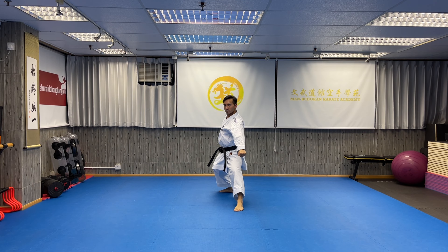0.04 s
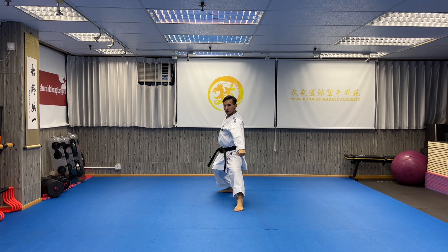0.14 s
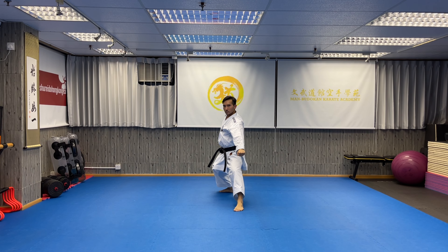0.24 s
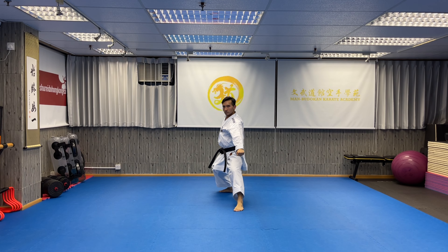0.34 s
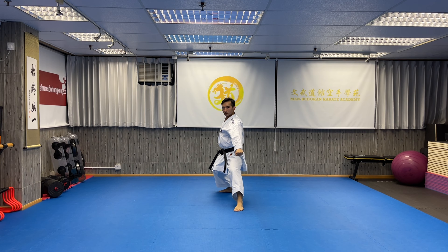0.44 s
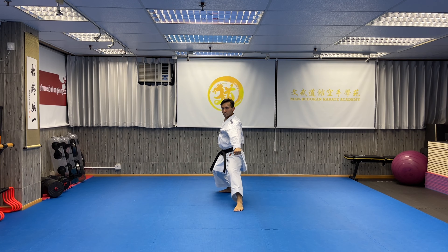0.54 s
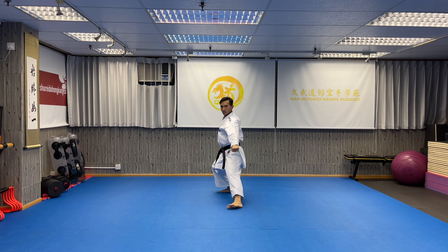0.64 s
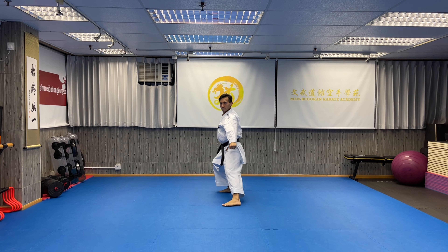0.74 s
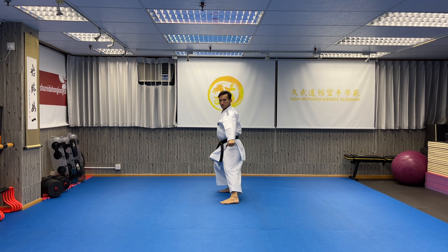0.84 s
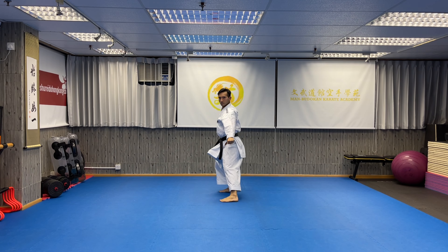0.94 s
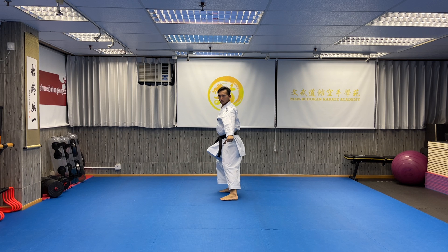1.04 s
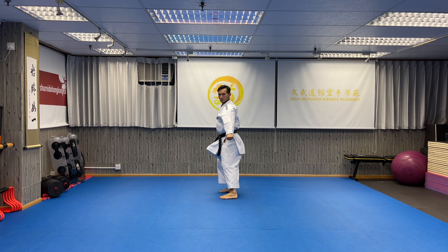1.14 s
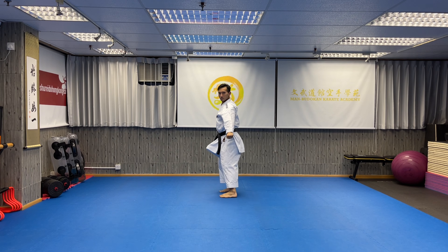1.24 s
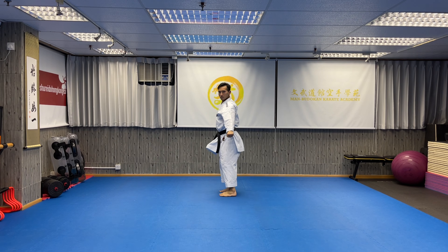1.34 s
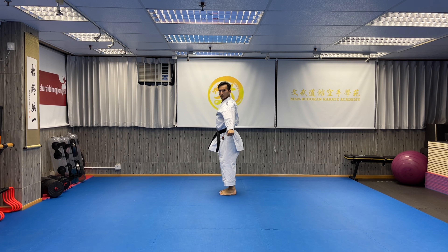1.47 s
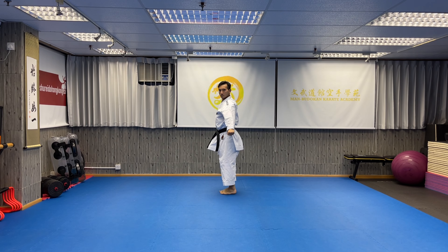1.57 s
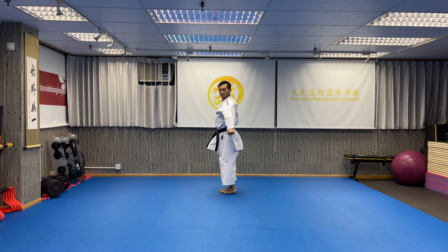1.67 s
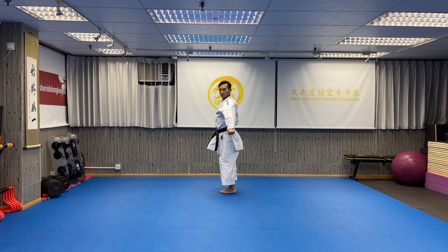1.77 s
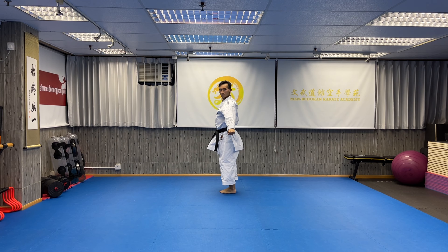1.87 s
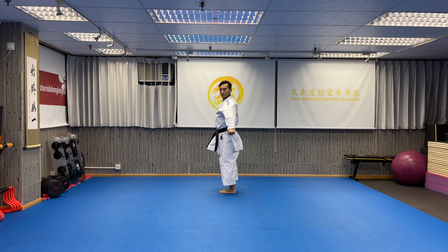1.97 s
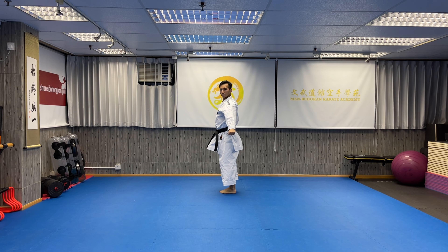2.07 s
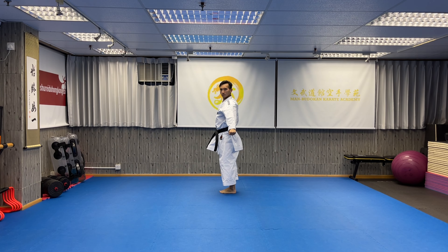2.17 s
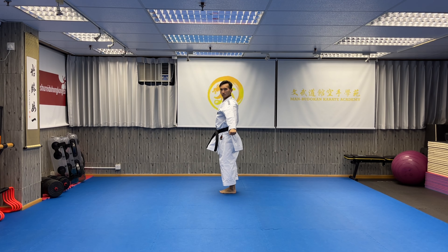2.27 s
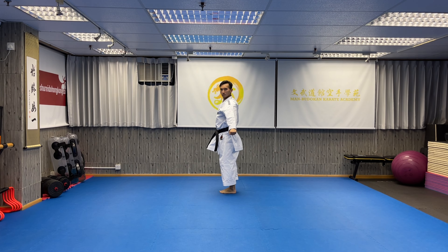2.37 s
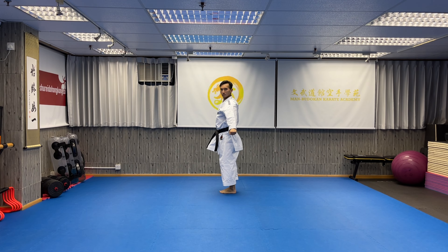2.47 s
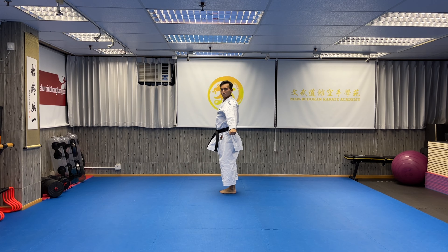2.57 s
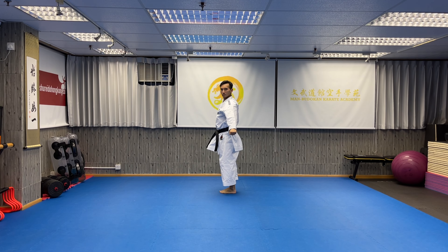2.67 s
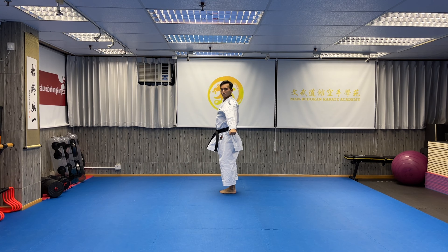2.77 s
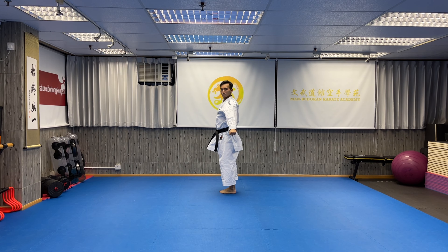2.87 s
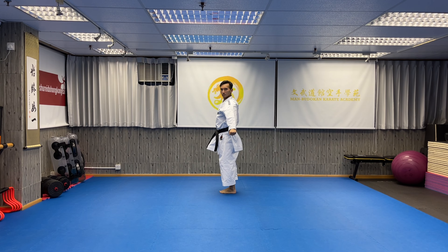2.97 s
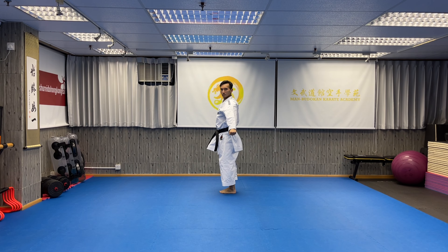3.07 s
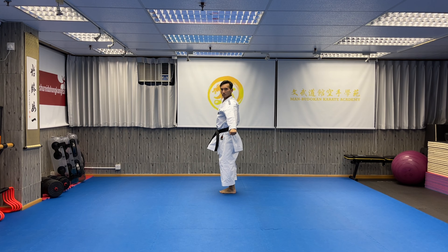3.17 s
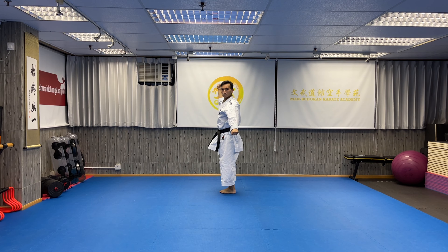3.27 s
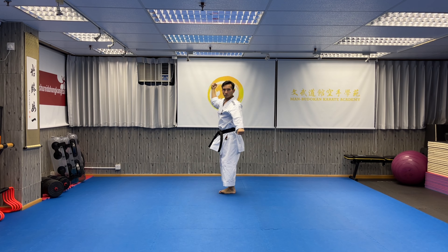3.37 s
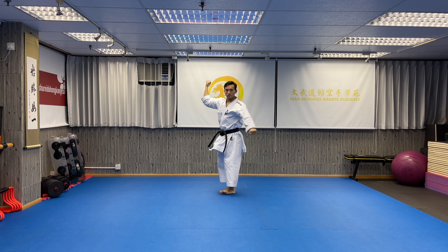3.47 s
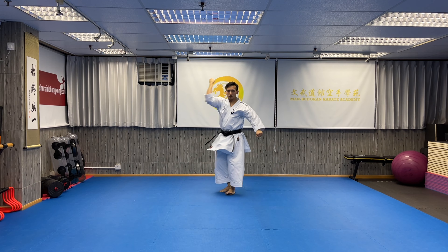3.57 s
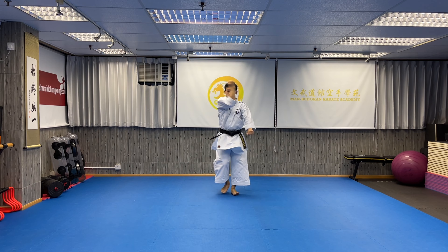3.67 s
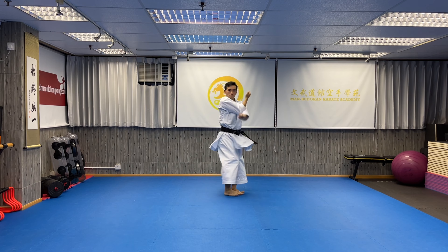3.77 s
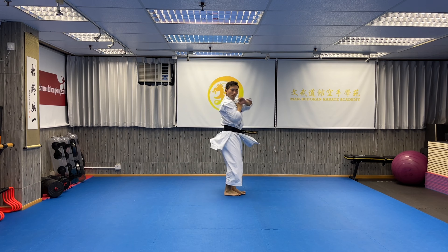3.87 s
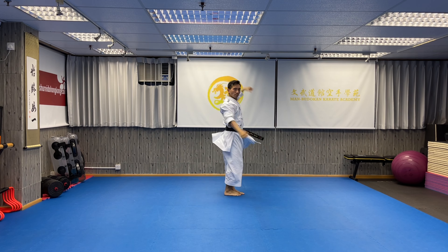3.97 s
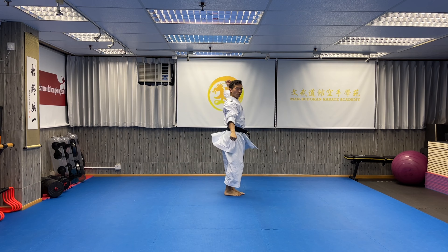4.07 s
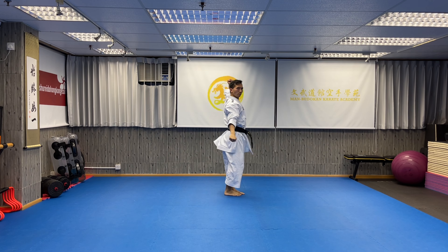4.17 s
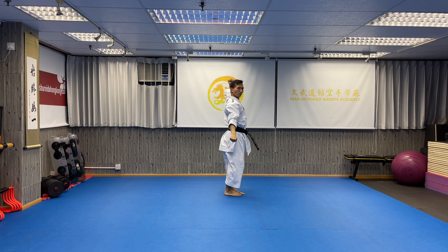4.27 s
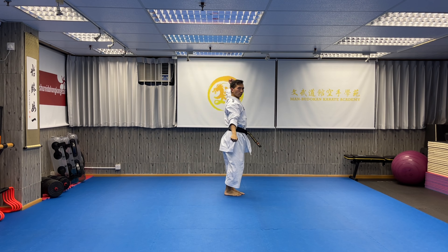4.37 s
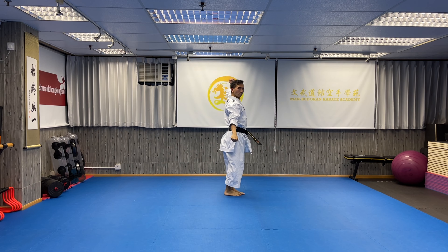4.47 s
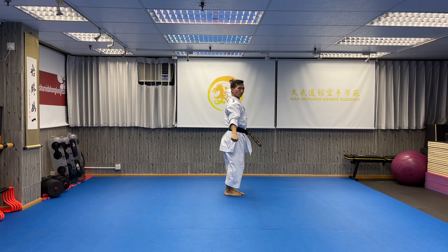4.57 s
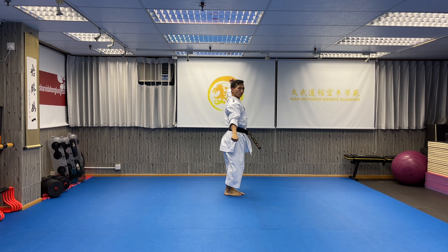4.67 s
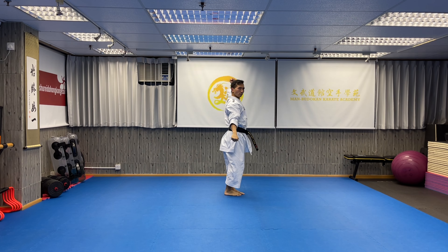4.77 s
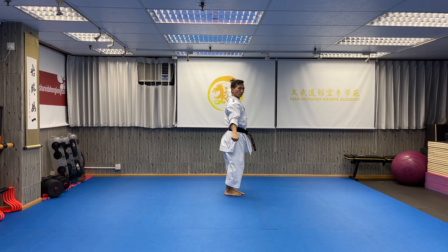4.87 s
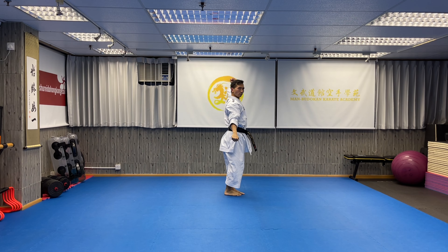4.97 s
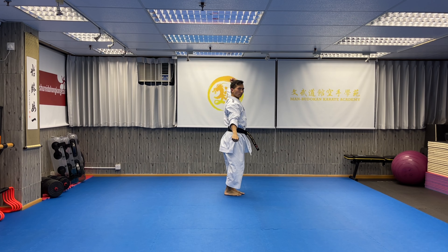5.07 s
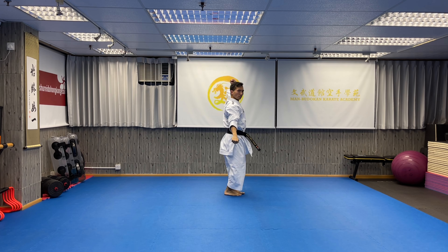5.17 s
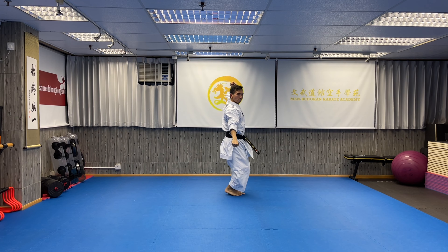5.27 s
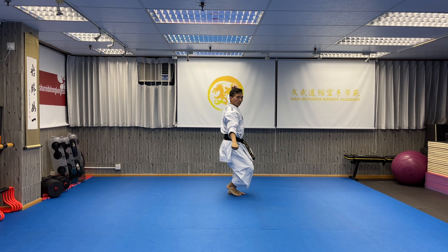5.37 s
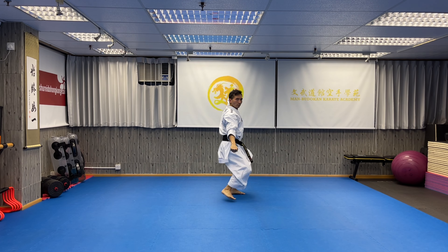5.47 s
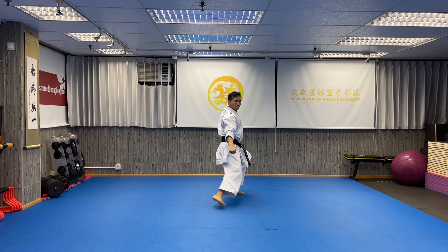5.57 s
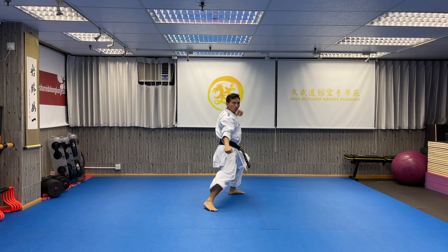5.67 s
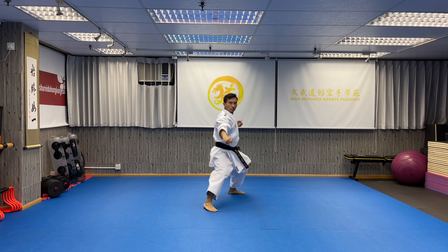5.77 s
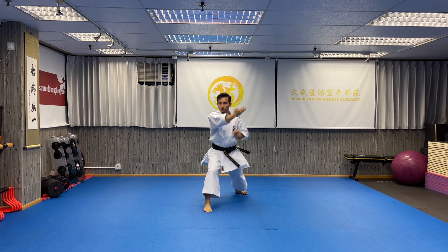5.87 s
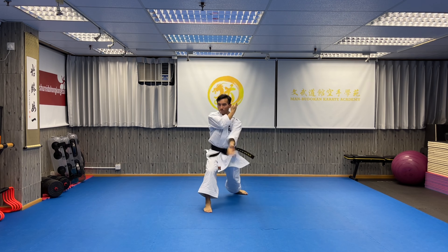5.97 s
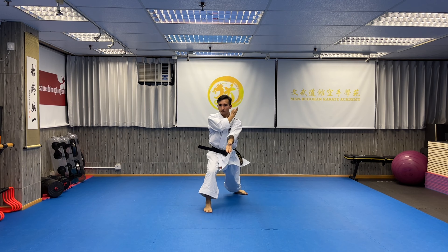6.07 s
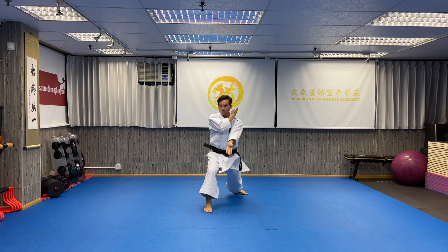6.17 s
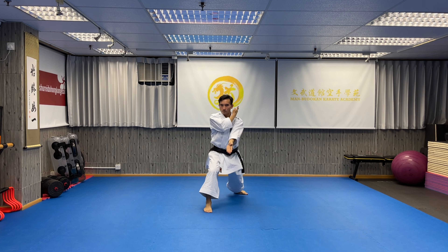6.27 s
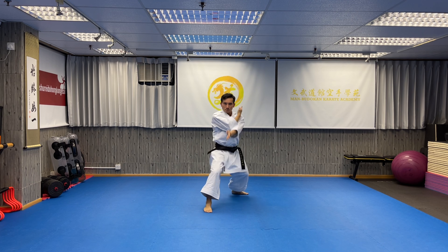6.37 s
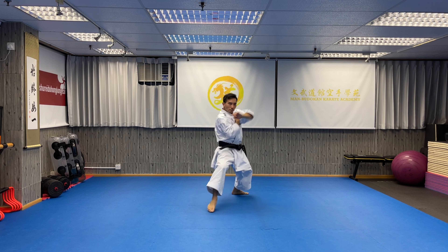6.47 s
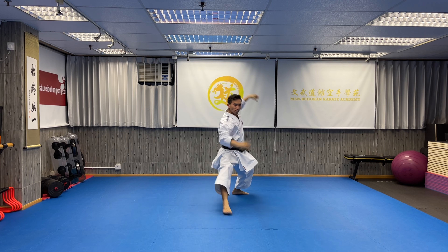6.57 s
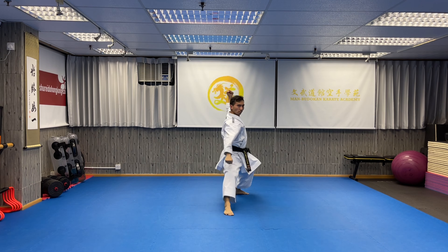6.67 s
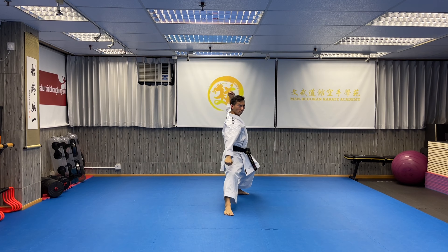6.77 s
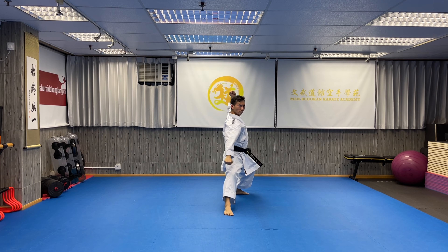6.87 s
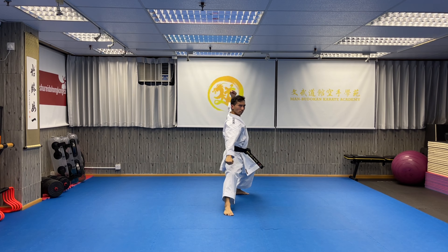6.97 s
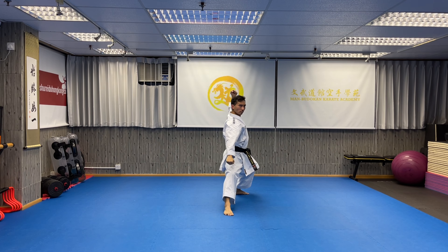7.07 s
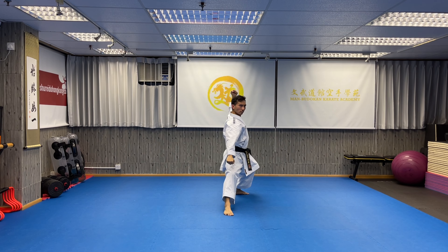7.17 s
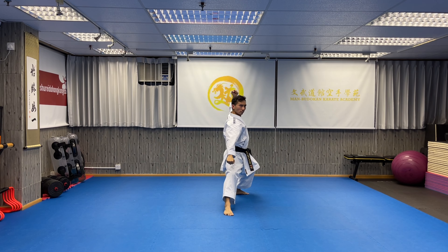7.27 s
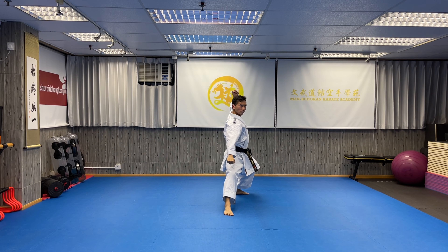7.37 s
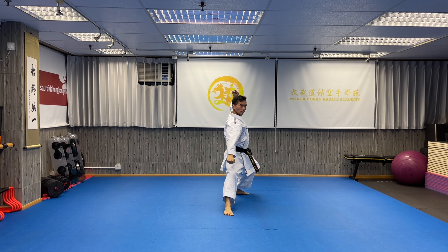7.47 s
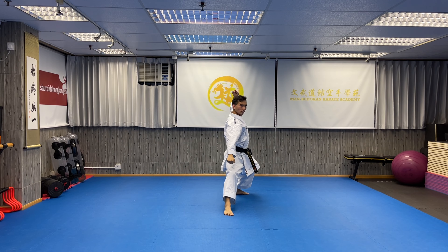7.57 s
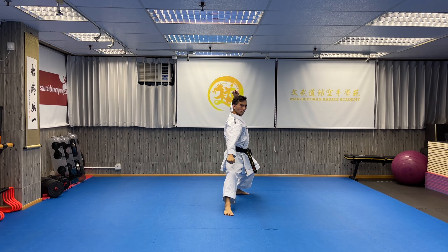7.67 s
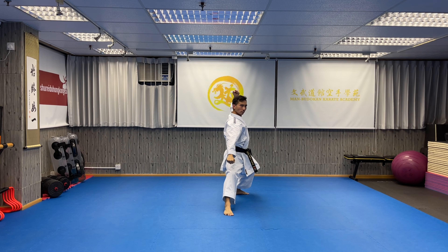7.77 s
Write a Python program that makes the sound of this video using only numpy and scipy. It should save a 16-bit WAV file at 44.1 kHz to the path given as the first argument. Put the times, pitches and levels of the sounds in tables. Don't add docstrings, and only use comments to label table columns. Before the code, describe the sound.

A karate practitioner moves alone in a matted indoor hall with rumbling air ducts. First comes a soft thump and a long skin-on-foam slide, then quiet. Two quick clusters of fabric swishes, flaps and taut pops with dull landings follow, separated by faint ticks of settling cloth. A final sharp crack and deep stomp end the action, leaving the hum. Room microphone, stereo, modest reverberation.

```python
import sys
import numpy as np
from scipy import signal
from scipy.fft import rfft, irfft, next_fast_len
from scipy.io import wavfile
from scipy.ndimage import uniform_filter1d

SR = 44100
rng = np.random.default_rng(int(sys.argv[2]) if len(sys.argv) > 2 else 0)


def wav_out(sig):
    wavfile.write(sys.argv[1], SR, np.round(np.clip(np.atleast_2d(sig).T, -1, 1) * 32767).astype(np.int16))


def undo_db(level):
    steps = np.asarray(level, float) / 20
    return 10 ** steps


N = 345301


def rms_one(x):
    return x / np.sqrt(np.mean(x ** 2) + 1e-20)


def in_time(rows):
    s, *columns = np.transpose(rows)
    s = np.r_[s[0] - .2, s, s[-1] + .2]
    return [np.interp(np.arange(N) / SR, s, np.r_[-110, c, -110]) for c in columns]


def at_hz(points, hz):
    f, value = np.array(points)[:, 0], np.array(points)[:, 1]
    return np.interp(np.log(hz + 1), np.log(f), value)


def drift(rate):
    r = np.exp(-80 * np.pi * rate / SR)
    slow = signal.lfilter([1], [1, -2 * r, r * r], rng.standard_normal(N // 40 + 2002))[2000:]
    return np.interp(np.arange(N) / 40, np.arange(len(slow)), rms_one(slow))


def gestures(rows, release_db):
    rise_db, sag_db_per_s = 22, 56
    t, power = np.arange(0, N / SR + .002, .001), 1e-11
    for s, db, rise, hold in rows:
        held = np.clip(t - s, 0, max(hold, 0))
        approach_db = rise_db * np.maximum(s - t, 0) / max(rise, .003)
        decay_db = sag_db_per_s * held + release_db * (np.maximum(t - s, 0) - held)
        power = power + undo_db(2 * (db - approach_db - decay_db))
    return np.interp(np.arange(N) / SR, t, 10 * np.log10(power))


def hollow(hz, width_hz):
    a, b = signal.sosfilt(signal.butter(2, width_hz / 2, fs=SR, output="sos"), rng.standard_normal((2, N)))
    phase = 2 * np.pi * np.cumsum(hz + np.zeros(N)) / SR
    return rms_one(a * np.cos(phase) + b * np.sin(phase))


# f/Hz, coherence/1
FIELD_COHERENCE = [(40, .997), (130, 0.97), (270, 0.64), (590, 0.015), (1260, 0.14), (2700, 0.36),
                   (5800, 0.51),
                   (7500, .85), (8600, .97), (9700, .996), (10800, .996), (11900, .92), (20000, .88)]


def spread(pair, gain, near=0):
    size = next_fast_len(pair.shape[1])
    hz = np.arange(size // 2 + 1) * SR / size
    mid, side = rfft(pair, size) * gain(hz)
    alike = np.clip(at_hz(FIELD_COHERENCE, hz), 0, 1)
    alike = alike + np.clip(near, 0, 1) * (1 - alike) * (hz < 7500)
    mid, side = np.sqrt(1 + alike) * mid, np.sqrt(1 - alike) * side
    return irfft([mid + side, mid - side], size)[:, :pair.shape[1]]


def rubbing(spectrum, per_s, uneven_db, flicker_db, flicker_rate):
    slips = (rng.random((2, N)) < per_s / SR) * rng.choice([-1, 1], (2, N))
    slips = slips * undo_db(uneven_db * np.minimum(rng.exponential(1, (2, N)), 4))
    slips = slips * undo_db(flicker_db * drift(flicker_rate))

    def colour(hz):
        inside = (hz > spectrum[0][0]) & (hz < spectrum[-1][0])
        return undo_db(at_hz(spectrum, hz)) * inside

    return rms_one(spread(slips, colour, near=0.35))


# f/Hz, density/dB
AIR_SPECTRUM = [(35, -19.5), (60, -3), (80, -5.5), (133, -8.5), (309, -17.5), (400, -20), (436, -24),
                (475, -24), (683, -31.5), (1050, -33), (1540, -42.5), (2810, -52), (3700, -60),
                (4810, -100), (8140, -120)]
# f/Hz, density/dB
RUMBLE_SPECTRUM = [(14, -22.5), (24, -9), (34, 3), (44, -16), (60, -46.5)]
# f/Hz, frequency wander/Hz
DUCT_BOOM = (49, 1.73)
# t/s, level/dB
AIR_SURGES = [(.06, -30.5), (.42, -29), (.65, -28.5), (1.05, -28), (1.38, -27), (1.68, -30.5),
              (2.15, -28.5), (2.48, -26.5), (2.85, -32.5), (3.07, -26), (3.48, -26), (3.84, -26.5),
              (4.05, -29), (4.26, -33.5), (4.57, -32), (4.77, -28.5), (5.3, -31.5), (5.58, -26),
              (5.9, -26.5), (6.19, -30), (6.65, -28), (6.9, -32), (7.15, -32), (7.5, -37), (7.83, -43)]
# t/s, level/dB
FAN_WHISTLE = [(0, -75), (.3, -73), (.6, -68), (.8, -80), (2.3, -92), (2.42, -74), (2.8, -72), (3.2, -73),
               (3.4, -100), (7.83, -100)]


def ventilation():
    air = rms_one(spread(rng.standard_normal((2, N)), lambda hz: undo_db(at_hz(AIR_SPECTRUM, hz))))
    air_db = -35 + 0.26 + 0.193 * drift(0.59)
    rumble = rms_one(spread(rng.standard_normal((2, N)),
                            lambda hz: undo_db(at_hz(RUMBLE_SPECTRUM, hz)) * (hz > 12) * (hz < 60)))
    boom_hz, wander_hz = DUCT_BOOM
    boom = np.sin(2 * np.pi * np.cumsum(boom_hz + wander_hz * drift(2.77)) / SR)
    surge_rise_s, surge_hold_s = 0.27, 0.0616
    surges = [(s, db, surge_rise_s, surge_hold_s) for s, db in AIR_SURGES]
    boom_db = gestures(surges, release_db=72.5) - 2.0
    phase = 2 * np.pi * np.cumsum(2850 + 4.8 * drift(9)) / SR
    whistle = undo_db(in_time(FAN_WHISTLE)[0] + 1.8 * drift(12)) * np.sin(phase)
    return undo_db(air_db) * air + undo_db(boom_db) * boom + whistle + undo_db(-57) * rumble


# t/s, level/dB, hold/s, f/Hz, width/Hz
SOFT_RUSTLES = [(0.507, -57, .05, 2900, 2600), (1.93, -76, .1, 5800, 900), (5.406, -52, .04, 10500, 4000),
                (5.81, -45, .035, 10500, 4000), (6.19, -65.5, .1, 3500, 1600), (6.76, -53, .05, 1900, 600)]


def rustles():
    out, rise_s = 0, .06
    for s, db, hold, hz, width in SOFT_RUSTLES:
        band = signal.butter(2, [hz - width / 2, hz + width / 2], "band", fs=SR, output="sos")
        mid, side = rms_one(signal.sosfilt(band, rng.standard_normal((2, N))))
        apart = .5 * min(1, 2500 / hz) ** 1.5
        level_db = gestures([(s, db, rise_s, hold)], release_db=108)
        out = out + undo_db(level_db) * (mid + apart * side * [[1], [-1]])
    return out


# t/s, level/dB
SOLE_SPEED = [
    [(0.4, -87), (0.47, -77), (0.512, -69), (0.557, -60), (0.566, -54), (0.646, -54.5), (0.68, -59)],
    [(0.703, -40), (0.771, -37.5), (0.95, -40), (1.051, -41), (1.151, -42), (1.563, -51.5), (1.701, -55.5),
     (1.891, -78)],
    [(2.055, -71.5), (2.2, -73), (2.5, -98), (2.6, -102)],
]
# f/Hz, density/dB
SOLE_SPECTRUM = [(880, -7.5), (1500, -10), (2110, -7), (3540, -9.5), (3880, -10), (5800, -9), (7520, -8.5),
                 (8840, -7), (10100, -3.5), (11500, -2.5), (12800, -20), (16600, -39.5), (22000, -120)]
# f/Hz, density/dB
FOLD_SPECTRUM = [(300, 4), (600, 4), (1000, 2), (1400, 0.5), (2000, -11), (3000, -13), (4500, -27.5)]
# f/Hz, density/dB
PUSH_SPECTRUM = [(60, 0.5), (120, 4.5), (250, 1), (420, -2), (700, -16.5)]
# t/s, level/dB, rise/s, hold/s, f/Hz, width/Hz
HEEL_TWIST = (2.12, -71, .4, .2, 3850, 300)
# t/s, f/Hz, level re hiss/dB, toe gap level/dB
ARCH_HOLLOW = [(.68, 1980, -10, 1), (.78, 2196, -9, 3), (0.901, 3096, -8, -4), (1.0, 2710, -5, 4),
               (1.1, 2490, -9, -10), (1.22, 2200, -12.5, -4), (1.4, 1497, -6.5, -7), (1.55, 1302, -4, -15),
               (1.8, 1410, -12, -17)]


def slide():
    hiss_db, = in_time(sum(SOLE_SPEED, []))
    swing_db = hiss_db - hiss_db.max()
    stop_db = np.minimum(hiss_db + 85, 0)
    hiss = undo_db(hiss_db + 2.5) * rubbing(SOLE_SPECTRUM, per_s=19000, uneven_db=2.5, flicker_db=0.5, flicker_rate=15)

    scuff_db = -47.5 + 0.31 * swing_db + stop_db
    scuff = undo_db(scuff_db) * rubbing(FOLD_SPECTRUM, per_s=8000, uneven_db=7.0, flicker_db=1.0, flicker_rate=20)
    give_db = -45.5 + 0.026 * swing_db + stop_db
    give = undo_db(give_db) * rubbing(PUSH_SPECTRUM, per_s=1400, uneven_db=-1.0, flicker_db=1.5, flicker_rate=8.4)

    *gesture, hz, width = HEEL_TWIST
    band = signal.butter(2, [hz - width / 2, hz + width / 2], "band", fs=SR, output="sos")
    heel = undo_db(gestures([gesture], release_db=90)) * rms_one(signal.sosfilt(band, rng.standard_normal(N)))

    s, arch_hz, arch_db, toes_db = np.transpose(ARCH_HOLLOW)
    t = np.arange(N) / SR
    arch_level = undo_db(np.interp(t, s, arch_db) + 1.0 * drift(15))
    arch = arch_level * hollow(np.interp(t, s, arch_hz), width_hz=1300)
    toes_level = undo_db(-12 + np.interp(t, s, toes_db) + 1.6 * drift(9))
    toes = toes_level * hollow(5800, width_hz=520)
    return hiss + undo_db(hiss_db + 1.5) * (arch + toes) + scuff + give + heel


# t/s, peak level/dB, f/Hz, T60/s
FOOTFALLS = [(0.52, -25, 141.3, 0.16), (0.55, -27.5, 242.5, 0.11), (0.579, -31, 111, 0.067),
             (0.702, -24.5, 156, 0.15), (3.644, -19, 136, 0.1), (3.7839, -7.5, 194, 0.062),
             (3.784, -25, 252, 0.032), (3.809, -25, 109, 0.17), (5.604, -25.5, 410, 0.087),
             (5.614, -22, 260, 0.078), (5.628, -12.5, 168, 0.054), (5.645, -23, 200, 0.04),
             (5.648, -27, 342, .06), (5.778, -14.5, 205, 0.12), (5.896, -13, 200, 0.034)]


def steps():
    out, t = np.zeros(N), np.arange(SR * 6 // 10) / SR
    sink = 1 - np.exp(-(t / 0.0045) ** 2)
    for s, db, hz, t60 in FOOTFALLS:
        i = round(s * SR)
        out[i:i + len(t)] += undo_db(db - 60 * t / t60) * np.sin(2 * np.pi * hz * t) * sink
    return out


# t/s, peak level/dB
HEAVY_STOMP = (6.5803, -0.5)
# f/Hz, level/dB, T60/s
FLOOR_MODES = [(82.3, -17.5, 1), (111, -15, 0.94), (131.2, 2.5, 0.16), (198, -15, 0.38), (227, -15, 0.18),
               (242, -3.5, 0.19), (285.6, -5, 0.07), (303, 5.5, 0.11), (321.6, 2, 0.08),
               (330.5, -7.5, 0.44), (390, -1.5, 0.11), (432, -8.5, 0.21)]


def stomp():
    out, t = np.zeros(N), np.arange(SR * 6 // 10) / SR
    modes = 0
    for hz, db, t60 in FLOOR_MODES:
        phase = rng.uniform(0, 0.33)
        modes = modes + undo_db(db - 60 * t / t60) * np.sin(2 * np.pi * hz * t + phase)
    thud = -modes * (1 - np.exp(-(t / 0.007) ** 2))
    s, peak_db = HEAVY_STOMP
    i = round(s * SR)
    out[i:i + len(t)] += undo_db(peak_db) * thud / np.abs(thud).max()
    return out


# time of full speed t/s, swish level/dB, rise/s, hold/s
LIMB_MOVES = [(3.087, -79, .1, 0.17), (3.311, -50.5, 0.053, 0.071), (3.418, -67, 0.062, 0.032),
              (3.531, -51, 0.069, 0.077), (3.622, -46.5, 0.14, .03), (3.72, -49, .12, .04),
              (3.773, -40, 0.056, .01), (3.803, -37.5, 0.058, 0.086), (3.914, -61, 0.12, .02),
              (4.005, -45.5, 0.16, 0.021), (4.15, -62.5, 0.099, 0.081), (4.36, -74.5, .1, 0.027),
              (4.54, -64, 0.014, .005), (4.666, -72.5, .1, 0.36), (5.054, -61, .012, .005),
              (5.16, -71, 0.12, .12), (5.318, -57, 0.23, .03), (5.38, -45.5, 0.071, 0.018),
              (5.567, -51.5, 0.18, 0.054), (5.617, -48.5, .05, .005), (5.717, -50, 0.17, .04),
              (5.764, -37, 0.023, 0.075), (5.857, -40.5, 0.034, 0.087), (5.964, -41, 0.065, 0.012),
              (6.1, -68, .06, .08), (6.24, -67, .2, .05), (6.35, -46.5, 0.028, 0.036),
              (6.42, -33.5, 0.096, 0.0092), (6.49, -43, 0.15, 0.079), (6.584, -29.5, 0.019, 0.0035)]
# time of widest swing t/s, level/dB, rise/s, hold/s
FOLD_FLAPS = [(3.3, -46, 0.11, 0.21), (3.53, -49.5, 0.1, .06), (3.645, -40, 0.18, 0.011),
              (3.72, -42, 0.086, .04), (3.77, -34, 0.031, 0.058), (3.92, -36, 0.41, 0.013),
              (4.0, -35, 0.036, 0.03), (4.2, -51, 0.15, 0.28), (4.544, -53, 0.026, 0.05),
              (5.058, -70, .02, .01), (5.36, -51, 0.4, 0.071), (5.61, -40.5, 0.22, 0.039),
              (5.72, -46, 0.16, .03), (5.764, -32.5, 0.027, 0.046), (5.85, -29.5, 0.075, 0.082),
              (5.96, -29, 0.15, 0.014), (6.41, -36.5, 0.13, 0.054), (6.495, -33, 0.1, 0.041),
              (6.586, -24.5, 0.021, 0.02), (6.625, -27.5, 0.043, 0.01)]
# f/Hz, density/dB
WEAVE_SPECTRUM = [(1200, -17), (2000, 7.5), (3000, 1), (4500, 1), (7000, 0.5), (9500, 2.5), (11500, 4.5),
                  (12500, -17), (16000, -20)]


def swish():
    weave_db = gestures(LIMB_MOVES, release_db=121)
    fold_db = gestures(FOLD_FLAPS, release_db=177)
    push_db = fold_db - 5.5 + (1 - 0.5) * np.clip(fold_db.max() - fold_db, 0, 40)
    puff_db, puff_rise_s, puff_hold_s = -14, 0.0092, 0.022
    feet = [(s, db + puff_db, puff_rise_s, puff_hold_s) for s, db, *_ in FOOTFALLS + [HEAVY_STOMP]]
    push_db = 10 * np.log10(undo_db(2 * push_db) + undo_db(2 * gestures(feet, release_db=153)))
    push_db = np.minimum(push_db, -29.5)
    weave = rubbing(WEAVE_SPECTRUM, per_s=15000, uneven_db=3.0, flicker_db=.7, flicker_rate=45)
    folds = rubbing(FOLD_SPECTRUM, per_s=3000, uneven_db=2.5, flicker_db=1.5, flicker_rate=25)
    push = rubbing(PUSH_SPECTRUM, per_s=1500, uneven_db=1.5, flicker_db=3.0, flicker_rate=16)
    return undo_db(weave_db + 1.2) * weave + undo_db(fold_db) * folds + undo_db(push_db) * push


# t/s, crackle peak level/dB, fold f/Hz, length/s, pop
# level/dB
CLOTH_SNAPS = [(0.564, -35, 2060, 0.0043, -39.5), (0.699, -42, 2020, 0.006, -35),
               (3.277, -52, 975, 0.04, -42.5), (3.505, -43, 1720, .008, -55), (3.758, -35, 4380, .012, -41),
               (3.801, -35, 1370, .012, -36), (3.99, -36, 6300, 0.0044, -46),
               (4.0005, -27.5, 2450, 0.0071, -35.5), (5.303, -42, 5720, .004, -50),
               (5.393, -35, 6500, .006, -41), (5.612, -48, 2330, 0.017, -40.5),
               (5.762, -55, 957, 0.017, -30.5), (5.842, -34, 1350, 0.0091, -31),
               (5.9612, -31, 1950, 0.006, -23.5), (6.048, -49.5, 1870, .004, -38),
               (6.426, -29, 5500, .02, -50), (6.5777, -22.5, 2250, 0.0026, -20.5),
               (6.581, -18, 2370, 0.0037, -18.5), (6.5808, -33.5, 5800, 0.0094, -27),
               (.508, -58, 2300, .004, -58), (.545, -50, 1210, .004, -50),
                  (4.544, -50, 5970, 0.0036, -56), (4.709, -62, 6000, .004, -64),
                  (4.946, -73, 7640, .015, -66), (5.055, -42, 1750, .006, -54),
                  (5.199, -54, 2130, .008, -62), (7.461, -85, 5230, .04, -69)]
# t/s, fold f/Hz, length/s, level/dB
FOLD_POPS = [(.512, 2150, 0.0067, -49), (0.54, 1260, 0.011, -44), (0.57, 1260, .008, -49),
             (3.761, 5800, .012, -42.5), (3.763, 1900, .015, -39), (3.8, 2850, .015, -41),
             (3.812, 4300, .007, -40), (3.878, 2680, .008, -38), (3.921, 1300, 0.01, -38),
             (3.939, 1050, .012, -38), (3.764, 1375, .012, -42), (3.784, 1250, .012, -43),
             (3.813, 1390, .016, -36), (3.862, 1310, .012, -37), (3.893, 2150, .01, -38),
             (4.003, 860, 0.014, -37), (4.042, 1010, 0.013, -42), (3.91, 713, 0.041, -37),
             (3.994, 1370, 0.021, -42), (4.013, 1128, 0.028, -38), (4.01, 1370, 0.013, -36),
             (5.758, 2700, 0.0096, -48), (5.772, 830, .012, -41), (5.792, 2020, 0.015, -37),
             (5.841, 2200, .012, -36.5), (5.86, 1250, .012, -33), (5.872, 1100, .009, -33.5),
             (5.885, 1090, .02, -40.5), (5.929, 2090, 0.014, -39.5), (5.976, 1814, 0.0097, -33),
             (5.911, 608, 0.022, -32.5), (5.961, 912, 0.0062, -30.5), (6.005, 997, 0.018, -38),
             (6.061, 1990, 0.0073, -50), (6.581, 11300, 0.0047, -19), (6.596, 2050, 0.005, -27)]


def snaps():
    out, t = np.zeros(N), np.arange(SR // 16) / SR
    crackle_under_pop_db = -10.5
    pops = [(s, db + crackle_under_pop_db, hz, length, db) for s, hz, length, db in FOLD_POPS]
    crackle_band = signal.butter(2, [1200, 12500], "band", fs=SR, output="sos")
    for s, crackle_db, hz, length, pop_db in CLOTH_SNAPS + pops:
        fine, flutter = rng.standard_normal((2, len(t)))
        shape = t / max(length, 1e-3)
        crackle = signal.sosfilt(crackle_band, fine * np.exp(-3.0 * shape))
        wobble = rms_one(signal.sosfilt(signal.butter(1, hz * 0.26, fs=SR, output="sos"), flutter))
        flutter_depth = min(0.34 / np.sqrt(hz * length), .09)
        pitch = hz * (1.03 - 0.065 * np.minimum(shape, 1) + flutter_depth * wobble)
        swell = shape * np.exp(1 - shape * 4) * 4
        pop = np.sin(2 * np.pi * np.cumsum(pitch) / SR) * swell
        i = round(s * SR)
        out[i:i + len(t)] += undo_db(crackle_db) * crackle / np.abs(crackle).max() + undo_db(pop_db) * pop
    return out


# f/Hz, T60/s
REVERBERATION = [(100, 0.14), (500, 0.93), (3000, 0.85), (7000, 0.33), (12000, 0.3)]


def hall(x):
    t, tail = np.arange(SR * 7 // 10) / SR, 0
    white = rng.standard_normal((2, len(t)))
    onset = np.clip((t - .003) / 0.0029, 0, 1)
    for hz in 70 * 2. ** np.arange(8):
        octave = signal.butter(2, [hz / 2 ** .5, hz * 2 ** .5], "band", fs=SR, output="sos")
        tail = tail + signal.sosfilt(octave, white) * undo_db(-60 * t / at_hz(REVERBERATION, hz)) * onset
    tail = spread(tail, np.ones_like)
    tail = tail / np.sqrt(np.mean(np.sum(tail ** 2, axis=1)))
    return signal.fftconvolve(x[None], tail, axes=1)[:, :N]


def scene():
    cracks, thuds = snaps(), steps() + stomp()
    hits = cracks + thuds + undo_db(-13.5) * hall(cracks + undo_db(-3.0) * thuds)
    return ventilation() + slide() + swish() + hits + rustles()


# f/Hz, density/dB
HISS_SPECTRUM = [(2290, -51), (3900, -6), (4830, -7), (8010, -9.5), (10300, -4.5), (12800, -11),
                 (16600, -41.5), (22000, -120)]
# f/Hz, left lead/rad, left-right level/dB, common level/dB
PORT_RESPONSE = [(0, 0, .2, 0), (300, .15, .9, 0), (1200, 0, .4, 0), (2700, .7, 1.5, 0), (4500, .6, 4.2, 0),
                 (7600, .9, 1, 0), (8250, .65, 0, 0), (8650, 0, 0, 0), (9300, -1.4, 0, 0),
                 (10250, -3.14, 0, 1), (11000, -4.5, 0, 1), (12000, -5.9, 0, 0), (12700, -6.3, 0, -1),
                 (13300, -6.7, 0, -8), (14000, -6.7, 0, -26), (14400, -6.3, 0, -50), (22050, -6.3, 0, -50)]


def microphone(dry):
    hiss = rms_one(spread(rng.standard_normal((2, N)), lambda hz: undo_db(at_hz(HISS_SPECTRUM, hz))))
    size = next_fast_len(N)
    hz = np.arange(size // 2 + 1) * SR / size
    port_hz, *columns = np.transpose(PORT_RESPONSE)
    lead, pan_db, common_db = [np.interp(hz, port_hz, c) for c in columns]
    side = np.array([[.5], [-.5]])
    ports = np.exp(1j * lead * side) * undo_db(common_db + pan_db * side)
    return irfft(rfft(dry + undo_db(-79.5 + 3.0) * hiss, size) * ports, size)[:, :N]


def gain_control(x):
    over_db = np.maximum(20 * np.log10(uniform_filter1d(np.abs(x).mean(axis=0), size=441) + 1e-9) + 22, 0)
    back = 0.6 * np.arange(N) / SR
    duck_db = np.maximum(np.maximum.accumulate(0.12 * over_db + back) - back, 0)
    r = np.exp(-1 / (.08 * SR))
    return x * undo_db(-signal.lfilter([1 - r], [1, -r], duck_db))


def treble_gate(x):
    first, width, count = 432, 16, 24
    weak_db, follows, memory = -5.5, .65, .3
    z = signal.stft([x[0] + x[1], x[0] - x[1]], nperseg=2048, window="cosine")[2]
    top = z[:, first:first + width * count]
    power = np.mean(np.abs(top.reshape(2, count, width, -1)) ** 2, axis=2)
    level_db = 10 * np.log10(power + 1e-20)
    bright_db = level_db[0, 5:8].mean(axis=0)
    quiet_db = np.percentile(bright_db, 10)
    swing_db = signal.lfilter([1 - memory], [1, -memory], bright_db - quiet_db)
    strong = level_db > quiet_db + weak_db + follows * swing_db
    keep = np.ones(z.shape)
    keep[:, first:first + width * count] = np.repeat(strong, width, axis=1)
    mid, side = signal.istft(z * keep, nperseg=2048, window="cosine")[1][:, :N]
    return np.array([mid + side, mid - side]) / 2


# t/s, level/dB, length/s
SHEEN_PATCHES = [(.695, -67, .04), (1.215, -65, .04), (3.768, -67, .03), (5.765, -64, .035),
                 (6.355, -74, .025), (6.5773, -52, .002), (6.58, -56, .003)]
# lower f/Hz, upper f/Hz
SHEEN_BAND = (14700, 15600)


def sheen():
    t, gate = np.arange(N) / SR, 0
    for s, db, length in SHEEN_PATCHES:
        edge = np.minimum(t - s, s + length - t) / (.25 * length)
        gate = gate + undo_db(db) * np.clip(edge + .5, 0, 1)
    band = signal.butter(6, SHEEN_BAND, "band", fs=SR, output="sos")
    return gate * rms_one(signal.sosfilt(band, rng.standard_normal(N)))


def band_limit(x):
    return signal.sosfilt(signal.butter(12, 16300, fs=SR, output="sos"), x)


def record(dry):
    x = gain_control(microphone(dry))
    return band_limit(np.clip(treble_gate(x) + sheen(), -1, 1))


dry = scene()
out = record(dry)
wav_out(out)
```